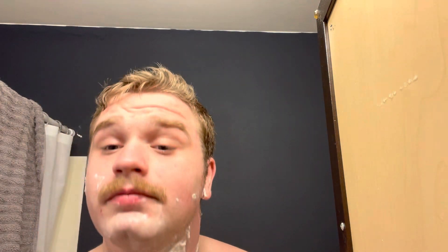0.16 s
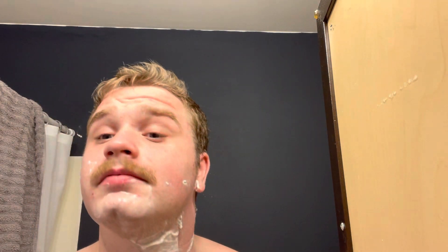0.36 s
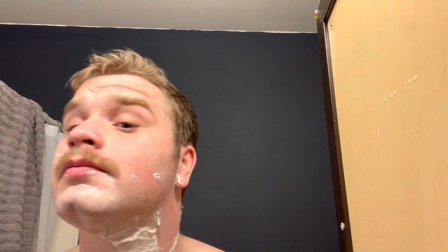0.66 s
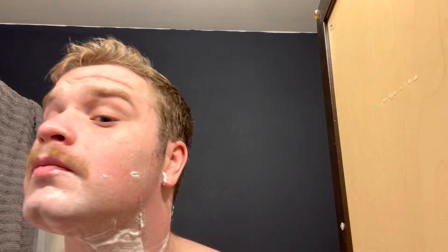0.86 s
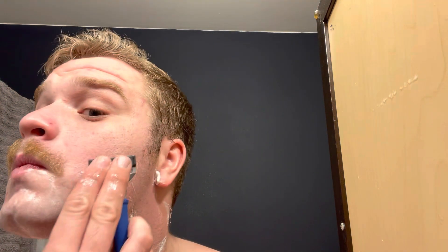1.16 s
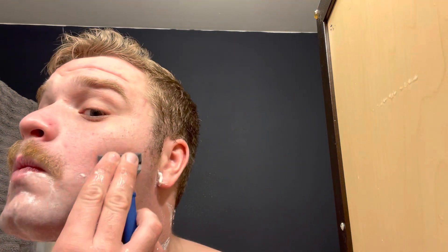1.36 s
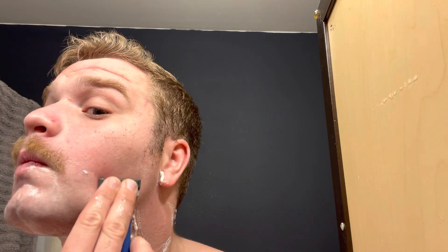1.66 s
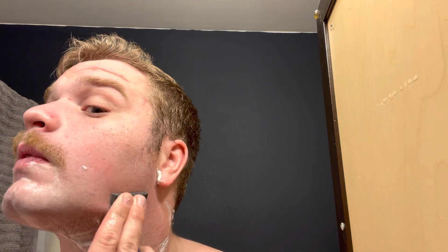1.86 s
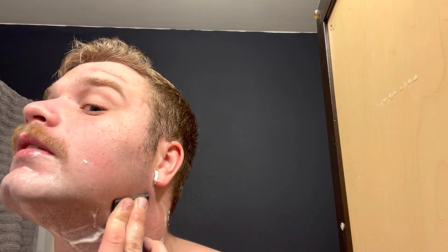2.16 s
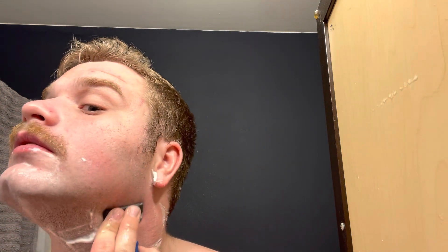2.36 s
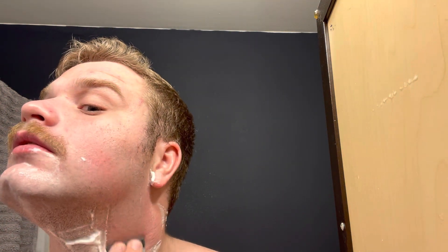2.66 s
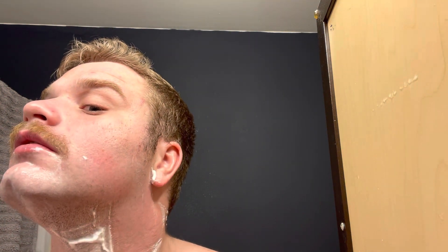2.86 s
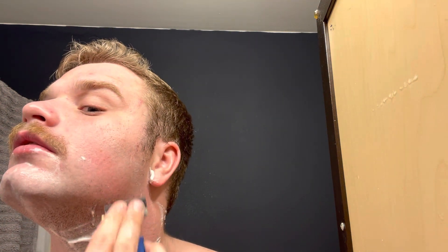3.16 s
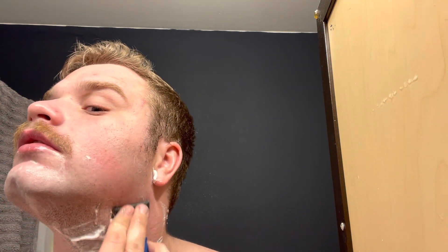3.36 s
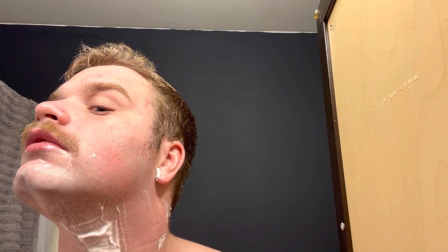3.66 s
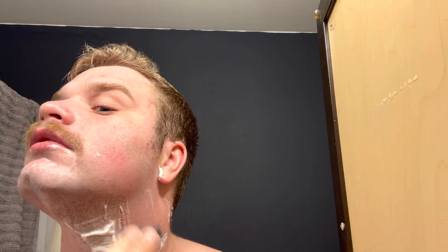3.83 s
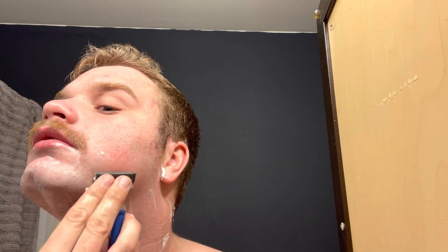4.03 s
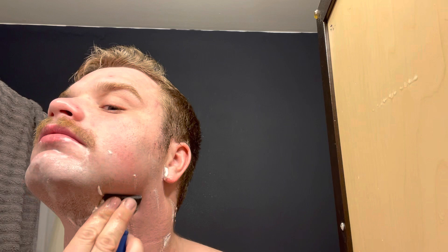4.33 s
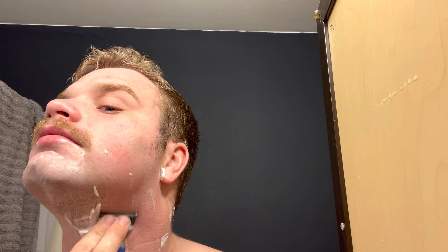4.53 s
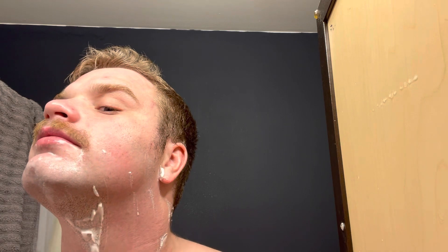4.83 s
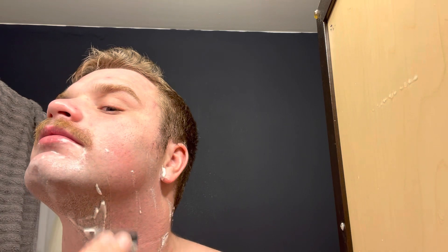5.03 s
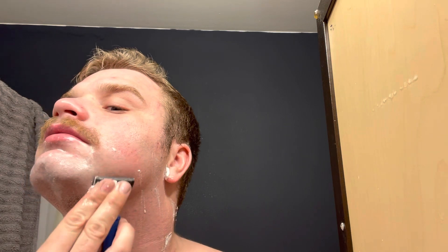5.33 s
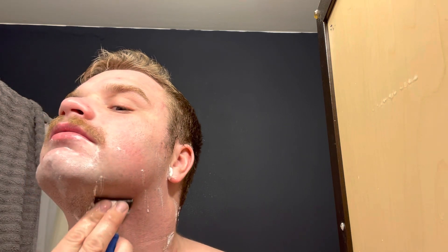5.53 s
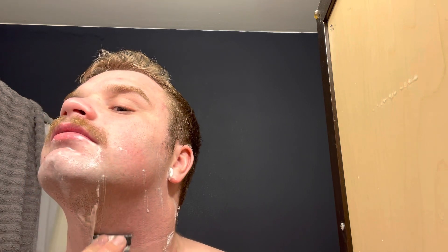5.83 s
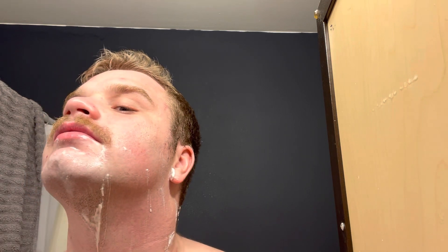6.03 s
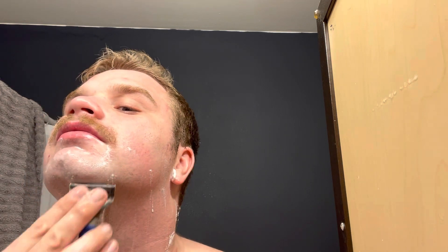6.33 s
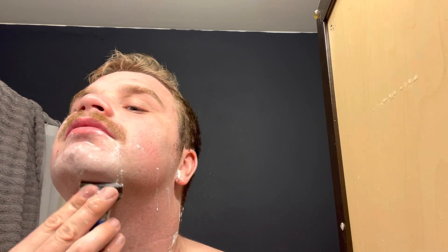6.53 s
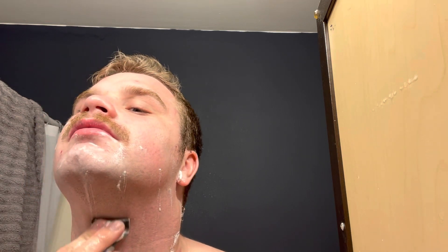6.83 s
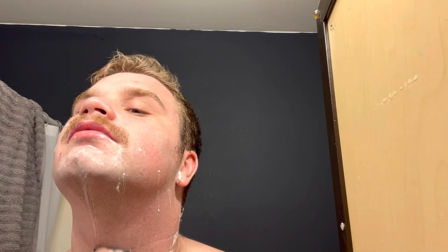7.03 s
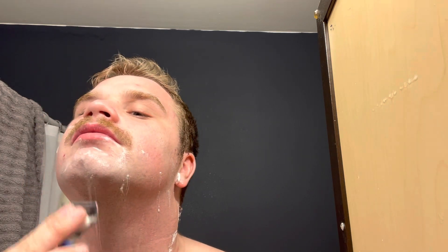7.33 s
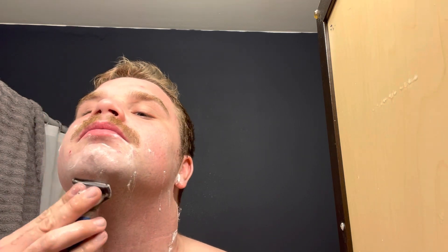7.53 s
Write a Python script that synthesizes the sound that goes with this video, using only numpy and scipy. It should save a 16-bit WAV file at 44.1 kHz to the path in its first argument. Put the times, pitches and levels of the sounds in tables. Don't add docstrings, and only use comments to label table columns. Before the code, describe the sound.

A hand razor scrapes gritty, crackling strokes down a cheek and lathered throat, close up, over a low steady fan hum in a small bathroom.

```python
import sys
import numpy as np
from scipy import signal
from scipy.fft import rfft, irfft, next_fast_len
from scipy.io import wavfile
from scipy.ndimage import uniform_filter1d, map_coordinates

SR = 44100
rng = np.random.default_rng(int(sys.argv[2]) if len(sys.argv) > 2 else 0)


def ratio_of_db(decibels):
    return 10 ** (np.asarray(decibels, float) / 20)


def waveform_to_disk(signal):
    frames = np.transpose(np.atleast_2d(signal))
    scaled = np.clip(frames, -1, 1) * 32767
    samples = np.round(scaled).astype(np.int16)
    wavfile.write(sys.argv[1], SR, samples)


N = 339129
FFT_SIZE = next_fast_len(N + SR)
HZ = np.maximum(np.fft.rfftfreq(FFT_SIZE, 1 / SR), 1)
LEFT_RIGHT = np.array([[1], [-1]])

# time_s, blade_pressure_db
CHEEK_STROKES = [
    [(1.38, -76), (1.408, -79), (1.45, -52.5), (1.56, -58), (1.592, -65.5), (1.698, -69), (1.828, -61.5),
     (1.936, -80), (1.95, -78)],
    [(1.93, -79), (2.014, -58.5), (2.114, -72), (2.142, -61), (2.152, -64), (2.186, -53), (2.226, -56),
     (2.232, -61.5), (2.3, -61)],
    [(2.28, -60), (2.482, -50.5), (2.512, -45), (2.604, -49.5), (2.652, -44), (2.736, -46.5), (2.756, -49),
     (2.804, -46), (2.93, -88)],
]
# time_s, blade_pressure_db
THROAT_STROKES = [
    [(3.24, -86), (3.31, -56), (3.366, -62.5), (3.394, -56), (3.472, -56), (3.572, -52), (3.646, -52),
     (3.668, -75), (3.76, -82.5)],
    [(4.11, -79.5), (4.176, -61.5), (4.3, -49.5), (4.378, -57), (4.484, -52.5), (4.798, -49.5),
     (4.834, -46), (4.854, -67), (4.93, -78)],
    [(5.32, -75), (5.418, -50.5), (5.5, -58.5), (5.648, -55), (5.872, -60), (5.922, -53.5), (5.97, -43.5),
     (6.052, -74), (6.12, -71)],
    [(6.48, -67), (6.488, -68), (6.54, -50.5), (6.668, -49), (6.684, -51.5), (6.932, -61.5), (6.934, -58.5),
     (7.05, -57), (7.14, -84)],
    [(7.51, -67), (7.518, -75), (7.548, -69), (7.552, -61), (7.602, -54.5), (7.686, -55), (7.69, -55)],
]
# time_s, blade_pressure_db
TOUCHES = [
    [(5.18, -99), (5.21, -73), (5.256, -80.5), (5.282, -75), (5.294, -88), (5.34, -74)],
    [(7.35, -93), (7.37, -80), (7.428, -73.5), (7.44, -59.5), (7.488, -72.5), (7.53, -70)],
]
STROKES = CHEEK_STROKES + THROAT_STROKES + TOUCHES


def rms_one(x):
    return x / np.sqrt(np.mean(x ** 2) + 1e-20)


def at_hz(points):
    hz, value = np.transpose(points)
    return np.interp(np.log(HZ), np.log(hz), value)


def shaped(x, gain):
    return irfft(rfft(x, FFT_SIZE) * gain, FFT_SIZE)[..., :N]


def drift(rate_hz):
    r = np.exp(-2 * np.pi * rate_hz / SR)
    noise = rng.standard_normal(N + SR)
    return rms_one(signal.lfilter([1], [1, -2 * r, r * r], noise)[SR:])


def resonance(hz, width_hz):
    return 1j * HZ * width_hz / (hz ** 2 - HZ ** 2 + 1j * HZ * width_hz)


def stroke_levels():
    # skin_drag_db, cutting_db, blade_db, foam_at_start_db, foam_piled_by_end_db
    skin = [(-10.5, -3, -5.5, -18.5, 26), (-5.5, -1.5, -3.5, -5, -7), (-9, -2.5, -4.5, -13.5, 12),
            (0.5, -5, -2, -7.5, 8.5), (-4, -6, -2.5, -14.5, 10.5), (1.5, -6, -3.5, -8.5, 7.5),
            (0.5, -4.5, -2, -11, 12.5), (2, -7, -0.5, -6.5, -5), (-4, -4.5, -4, 2, 0),
            (15, -8.5, -3, -9.5, -1)]
    drag_follows_foam, foam_muffles_cut, pile_power, lift_s = 0.34, 0.15, 2, 0.025
    levels = np.zeros((4, N))
    for rows, (drag_db, cut_db, blade_db, foam_db, piled_db) in zip(STROKES, skin):
        s, press_db = np.transpose(rows)
        span = slice(round(s[0] * SR), round(s[-1] * SR) + 1)
        t = np.arange(N)[span] / SR
        progress = np.clip((t - s[0]) / (s[-1] - s[0]), 0, 1)
        wet_db = piled_db * progress ** pile_power
        remaining_s = s[-1] - t + (s[-1] > 7.6)
        lift = np.clip(np.minimum(t - s[0], remaining_s) / lift_s, 0, 1)
        extras_db = [
            drag_db + drag_follows_foam * wet_db,
            cut_db - foam_muffles_cut * wet_db,
            blade_db,
            foam_db + wet_db,
        ]
        for level, extra_db in zip(levels, extras_db):
            level[span] += lift * ratio_of_db(np.interp(t, s, press_db) + extra_db)
    return levels


def razor(hairs_per_s=2400.0, spread_db=3.6, drag_db=-5.0, judder_db=1.3):
    # freq_hz, density_db_per_hz
    scrape_spectrum = [(200, -31), (300, -12), (450, -3), (800, -3), (1600, -12.5), (2200, -11),
                       (2840, -10.5), (3500, -19), (4100, -17.5), (6500, -19), (8900, -15.5), (11600, -17),
                       (13500, -20.5), (15500, -29.5)]
    # freq_hz, width_hz, level_db
    modes = [(2300, 120, 4.5), (2958, 460, 9.5), (3670, 94, 1.5), (4770, 440, -2.5), (5230, 230, -1.5)]
    levels = stroke_levels()
    sizes = ratio_of_db(spread_db * np.minimum(rng.exponential(1, N), 5)) * rng.choice([-1, 1], N)
    snap_chance = hairs_per_s * ratio_of_db(3.0 * drift(25)) / SR
    snaps = sizes * (rng.random(N) < snap_chance)
    drag = ratio_of_db(drag_db) * rng.standard_normal(N)
    scrape = (rms_one(snaps) + drag) * ratio_of_db(judder_db * drift(58))
    ringing = 1 + sum(ratio_of_db(db) * resonance(hz, width_hz) for hz, width_hz, db in modes)
    colour = ratio_of_db(at_hz(scrape_spectrum)) * ringing
    below = [1 / (1 + (HZ / edge_hz) ** 8) for edge_hz in (1700, 4000, 8900)]
    ranges = [below[0], below[1] - below[0], below[2] - below[1], 1 - below[2]]
    return sum(level * rms_one(shaped(scrape, colour * part)) for level, part in zip(levels, ranges))


def gripped(scrape, echo=0.22):
    # ring_hz, width_hz, ring_db, cheek_ring (-1 damped..1 added)
    grip = [(5800, 350, 0, 0.31), (5800, 310, 0, -0.046), (5800, 220, -8, 0.12), (5500, 490, -9, -0.23),
            (7000, 800, -2, -0.011), (6020, 220, -5, -0.48), (6300, 310, -6.5, -.3), (6300, 370, -11, -.3),
            (6020, 221, -8, -.1), (6300, 371, -11, -0.14)]
    # left_ms, right_ms
    hand_echo_ms = [(.65, .88), (.651, .88), (0.79, 1), (1, .65), (.81, .88), (0.94, 0.72), (1.05, 0.79),
                    (0.7, 1), (.87, .931), (0.66, 1.01)]
    cheek_hz, cheek_q = 2950, 5.0
    out = np.zeros((2, N))
    for rows, (hz, width_hz, db, cheek), echo_ms in zip(STROKES, grip, hand_echo_ms):
        a, b = round(rows[0][0] * SR) - 2000, round(rows[-1][0] * SR) + 2000
        part = scrape[a:b]
        part = part + ratio_of_db(db) * signal.lfilter(*signal.iirpeak(hz, hz / width_hz, SR), part)
        part = part + cheek * signal.lfilter(*signal.iirpeak(cheek_hz, cheek_q, SR), part)
        for side, ms in enumerate(echo_ms):
            out[side, a:b] = part + echo * np.roll(part, round(ms * SR / 1000))
    return out


def patchy(x, patch_db=0.7, own_db=0.8, turn_rad=0.6):
    _, _, frames = signal.stft(x, SR, nperseg=512)
    coarse = rng.standard_normal((4, 70, 100))
    rows = np.linspace(0, 69, frames.shape[1])
    columns = np.linspace(0, 99, frames.shape[2])
    grid = np.meshgrid(rows, columns, indexing="ij")
    shared, left, right, twist = [map_coordinates(c, grid, order=1) * 1.5 for c in coarse]
    gain_db = patch_db * shared + own_db * np.array([left, right])
    phase_rad = turn_rad * np.array([twist, -twist]) / 2
    return signal.istft(frames * ratio_of_db(gain_db) * np.exp(1j * phase_rad), SR, nperseg=512)[1][:, :N]


def ticks():
    # time_s, peak_db, left_right_db, centre_hz
    foam_ticks = [(0.1534, -52, -8, 3200), (0.3234, -50.5, 3, 5100), (0.4425, -43.5, -1.5, 11430),
                  (0.5247, -48.5, 0, 7000), (0.634, -57.5, 2, 2300), (0.6749, -51, 4, 6300),
                  (0.7781, -51, -1, 11130), (0.944, -66, 4, 7500), (1.3526, -49, 2, 5800),
                  (3.0855, -47, -2, 10370), (3.216, -66.5, 14, 3500), (3.8928, -64.5, -4, 6020),
                  (3.9218, -55.5, -14, 12000), (4.015, -55, 5, 4830), (4.039, -62, 2.5, 5000),
                  (4.117, -70, 4, 5040), (5.208, -53, -8.5, 8000), (5.2777, -58, 2, 4040),
                  (5.323, -57, 6, 5030), (6.2464, -51, -9, 7100), (6.4294, -27.5, -1, 8370),
                  (7.1266, -50, -0.5, 4500), (7.439, -46.5, 17, 1004), (7.509, -52, -2, 5500)]
    # time_s, peak_db, left_right_db, centre_hz
    stiff_hairs = [(2.02, -48, -1, 3470), (2.363, -29.5, 3.5, 9000), (2.5122, -32.5, -0.5, 3030),
                   (2.6544, -29, 8, 3500), (2.6824, -30, 1.5, 5230), (2.6983, -27, 11.5, 3000),
                   (2.7277, -27.5, 5.5, 4500), (2.7314, -24.5, 8, 3500), (4.7744, -33, 2, 8950),
                   (5.8131, -35, -1, 8000), (6.9374, -34.5, 6, 7500)]
    events = foam_ticks + stiff_hairs
    out, t = np.zeros((2, N)), np.arange(900) / SR
    for s, db, pan_db, hz in events:
        band = signal.butter(2, [hz / 1.8, min(hz * 2.2, 16000)], "band", fs=SR, output="sos")
        crackle = 0.4 * rng.standard_normal(len(t)) * ratio_of_db(-60 * t / 0.0081)
        burst = signal.sosfilt(band, (t == 0) + crackle)
        ring = 0.23 * np.sin(2 * np.pi * hz * t) * ratio_of_db(-60 * t / 0.013)
        burst = burst / np.max(np.abs(burst)) + ring
        i = round(s * SR)
        out[:, i:i + len(t)] += ratio_of_db(db + pan_db / 2 * LEFT_RIGHT) * burst / np.max(np.abs(burst))
    return out


def bumps():
    # time_s, peak_db, pitch_hz
    pushes = [
        (6.627, -48, 259),
        (6.692, -32, 278),
        (6.739, -38.5, 247),
        (6.918, -32.5, 293),
        (7.401, -40.5, 41.2),
        (7.436, -28, 41.9),
        (7.438, -35, 562),
    ]
    out, t = np.zeros(N), np.arange(6000) / SR
    for s, db, hz in pushes:
        envelope = (1 - np.exp(-t / 0.0069)) * ratio_of_db(-60 * t / 0.097)
        i = round(s * SR)
        out[i:i + len(t)] += ratio_of_db(db) * np.sin(2 * np.pi * hz * t) * envelope
    return out


def hiss():
    # freq_hz, density_db_per_hz
    rustle_spectrum = [(500, -32.5), (800, -7), (1200, -10.5), (1630, -23.5), (3500, -29.5), (5900, -29.5),
                       (9500, -28), (12000, -22), (14000, -30), (15500, -37.5)]
    # time_s, level_db
    movement = [(0, -66), (.6, -78), (.9, -71.5), (1.45, -75.5), (2.8, -67), (2.95, -90.5), (3.1, -81.5),
                (3.72, -64), (3.82, -82), (4.05, -80.5), (4.85, -64), (4.95, -94.5), (5.15, -88),
                (6.08, -64.5), (6.2, -71), (6.4, -65), (7.1, -72), (7.2, -83)]
    s, db = np.transpose(movement)
    level = ratio_of_db(np.interp(np.arange(N) / SR, s, db) + 2.4 * drift(10))
    colour = ratio_of_db(at_hz(rustle_spectrum)) * (HZ > 600)
    return level * rms_one(shaped(rng.standard_normal(N), colour))


def fan_hum():
    tones_hz = [39.27, 56.8, 63.2, 73.2, 110.27, 113.52, 116.78, 120.03, 123.28, 146.55, 156.83, 166.58,
                176.85, 180.1, 183.36, 220.03, 240.05, 339.66, 423.41, 480.1, 543.43]
    # peak_db, left_right_db
    tone_levels = [(-70.5, -6), (-52.5, 0.3), (-64, -9.5), (-69, -7.5), (-61.5, 10), (-52, 4), (-62, 1),
                   (-29, -1.5), (-68, 2.5), (-64, -8.5), (-67, -2.5), (-62.5, -8.5), (-57.5, 5),
                   (-63.5, 6.5), (-53.5, -4.5), (-64, 2.5), (-51, -3.5), (-67.5, -21.5), (-62, -1),
                   (-68, -14), (-71.5, -20.5)]
    t, hum = np.arange(N) / SR, np.zeros((2, N))
    for hz, (db, pan_db) in zip(tones_hz, tone_levels):
        start_rad = rng.uniform(0, 2 * np.pi)
        hum += ratio_of_db(db + pan_db / 2 * LEFT_RIGHT) * np.sin(2 * np.pi * hz * t + start_rad)
    return hum


def fan_air(level_db=-51.5):
    # freq_hz, density_db_per_hz
    air_spectrum = [(20, -15), (60, -2), (150, 2.5), (300, -1.5), (500, -8), (620, -14), (800, -32.5),
                    (1200, -34), (2000, -39.5), (4000, -47), (10000, -46.5), (13000, -39), (15500, -56)]
    # freq_hz, correlation
    air_alike = [(60, 0.98), (130, 0.32), (280, 0.84), (600, 0.16), (2000, .2)]
    # freq_hz, left_right_db
    air_side = [(60, 3), (200, -5.5), (350, -6.5), (700, -3.5), (2000, -1.5)]
    alike = np.clip(at_hz(air_alike), -1, 1)
    mid, side = rng.standard_normal((2, N))
    colour = ratio_of_db(at_hz(air_spectrum) + at_hz(air_side) / 2 * LEFT_RIGHT)
    common = shaped(mid, colour * np.sqrt(1 + alike))
    opposed = shaped(side, colour * np.sqrt(1 - alike) * LEFT_RIGHT)
    return ratio_of_db(level_db) * rms_one(common + opposed)


def at_ports(x, side_db, room_t60_s=0.11, room_lag_s=0.001):
    # freq_hz, lead_rad
    port_lead = [(200, 0.063), (600, 2), (1120, 4.62), (2240, 5.8), (2750, 8.6), (3800, 12.26), (5000, 14),
                 (6460, 13), (7400, 15.7), (8200, 15.5), (9500, 16.12), (11500, 18.85), (14500, 22.0)]
    # freq_hz, room_db
    room_share = [(500, -4), (2000, -4.5), (5000, -4.5), (7500, -3), (9000, -2.5), (15000, -11)]
    # freq_hz, width_hz, depth (0-1)
    port_dips = [
        [(1550, 100, 0.8), (2530, 190, 0.98), (3500, 170, 0.1), (9160, 800, 0.96)],
        [(1040, 440, 0.9), (1456, 490, 0.4), (2970, 130, .85), (9250, 630, 0)],
    ]
    t = np.arange(SR // 2) / SR
    tails = rng.standard_normal((2, len(t))) * ratio_of_db(-60 * t / room_t60_s) * (t > 0.002)
    tails = rfft(tails / np.sqrt(np.sum(tails ** 2, axis=1, keepdims=True)), FFT_SIZE)
    room = ratio_of_db(at_hz(room_share)) * tails * np.exp(-2j * np.pi * HZ * room_lag_s)
    direct = np.array([np.ones(len(HZ)), np.exp(-1j * at_hz(port_lead))])
    dips = np.ones((2, len(HZ)))
    for port, rows in enumerate(port_dips):
        for hz, width_hz, depth in rows:
            dips[port] *= 1 - depth * np.abs(resonance(hz, width_hz)) ** 2
    return shaped(x, dips * (direct + room) * ratio_of_db(side_db / 2 * LEFT_RIGHT))


def scene():
    # freq_hz, left_right_db
    razor_side = [(60, 3.5), (110, -4.5), (200, 6), (360, -6.5), (650, -4), (1180, -1), (2140, -1),
                  (3880, 2.5), (7030, 3.5), (12800, -1)]
    near = ratio_of_db(1.5) * patchy(gripped(razor())) + ratio_of_db(3.5) * hiss() + bumps()
    return at_ports(near, at_hz(razor_side)) + at_ports(ticks(), 0 * HZ) + fan_hum() + fan_air()


def emptied(x, gaps):
    hz, _, frames = signal.stft(x, SR, nperseg=2048)
    treble = np.log(np.sum(np.abs(frames[hz > 6000]) ** 2, axis=0) + 1e-20)
    spared = treble - np.maximum(np.roll(treble, 2), np.roll(treble, -2)) > 2.2
    hz = hz[:, None]
    for low_hz, high_hz in gaps:
        wander = uniform_filter1d(rng.normal(0, 1.3, (2, frames.shape[1])), size=2)
        low_step_hz, high_step_hz = 190 * np.round(wander)
        outside = (hz < low_hz + low_step_hz) | (hz > high_hz + high_step_hz)
        frames = frames * (outside | spared * (hz < 15700))
    return signal.istft(frames, SR, nperseg=2048)[1][:N]


def top_cut(x):
    return signal.sosfilt(signal.butter(12, 15700, fs=SR, output="sos"), x)


def record(dry):
    # low_hz, high_hz
    mid_gaps = [(8250, 9700), (13450, 22050)]
    # low_hz, high_hz
    side_gaps = [(11050, 12350), (15100, 22050)]
    mid = emptied((dry[0] + dry[1]) / 2, mid_gaps)
    side = emptied((dry[0] - dry[1]) / 2, side_gaps)
    return top_cut(np.array([mid + side, mid - side]))


dry = scene()
out = record(dry)
waveform_to_disk(out)
```